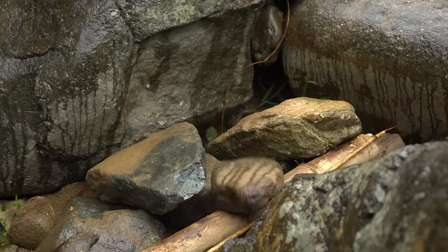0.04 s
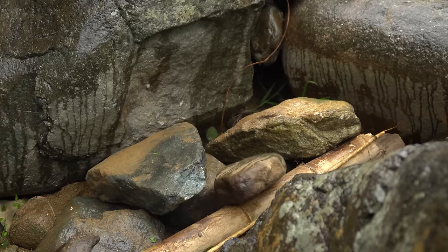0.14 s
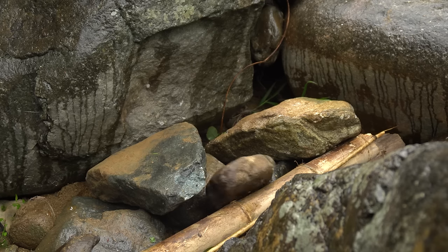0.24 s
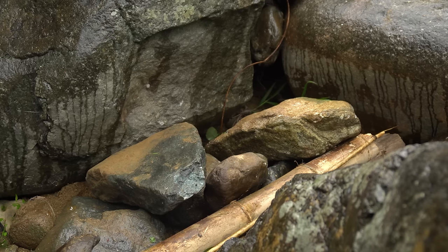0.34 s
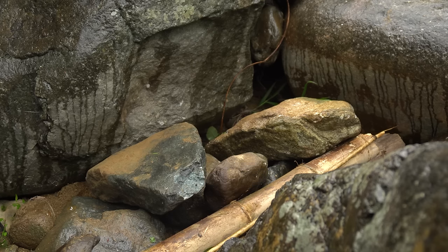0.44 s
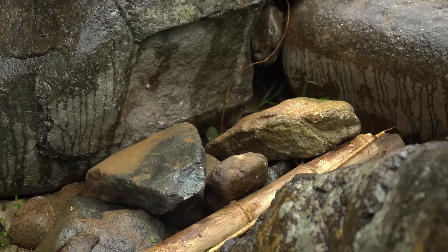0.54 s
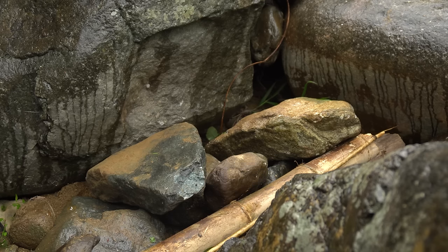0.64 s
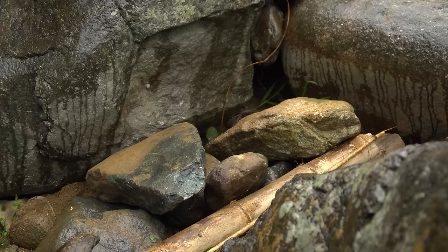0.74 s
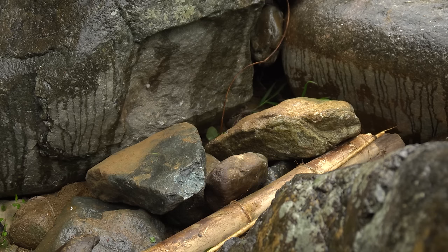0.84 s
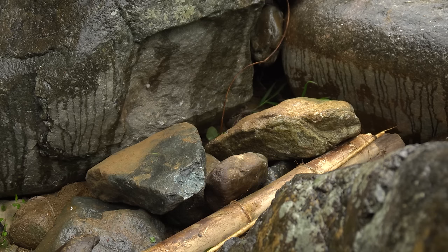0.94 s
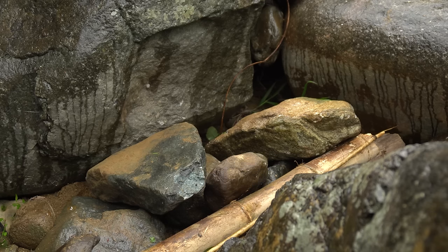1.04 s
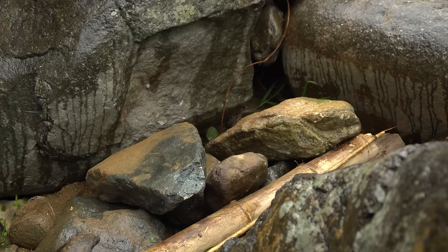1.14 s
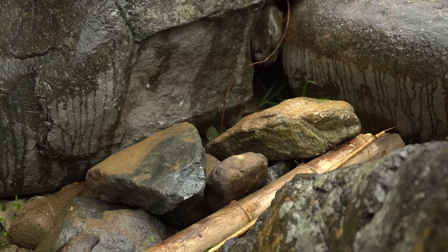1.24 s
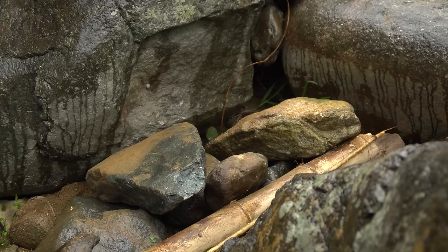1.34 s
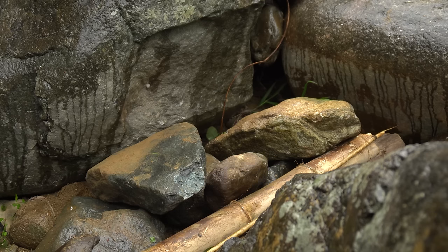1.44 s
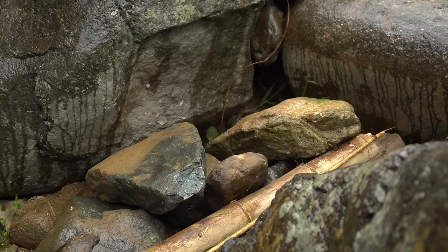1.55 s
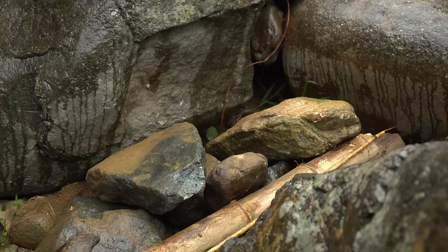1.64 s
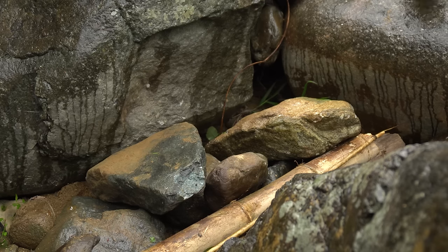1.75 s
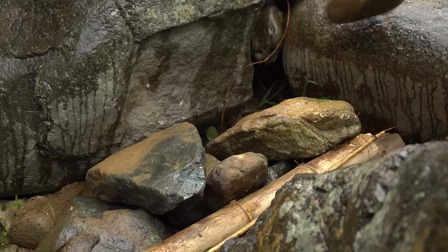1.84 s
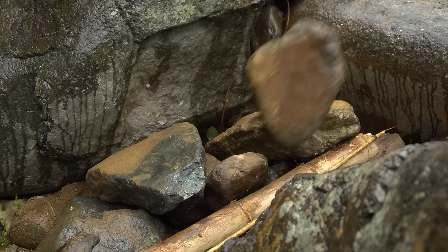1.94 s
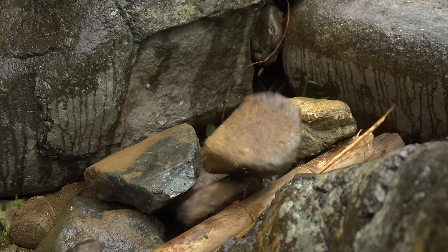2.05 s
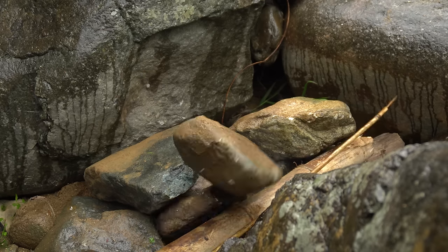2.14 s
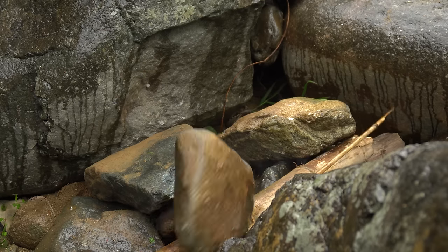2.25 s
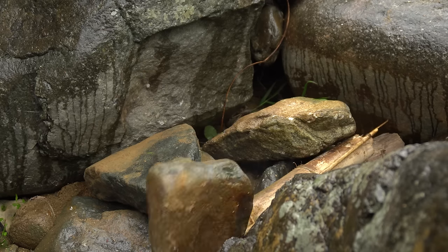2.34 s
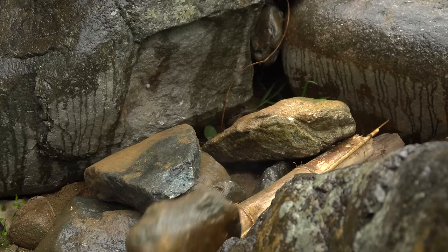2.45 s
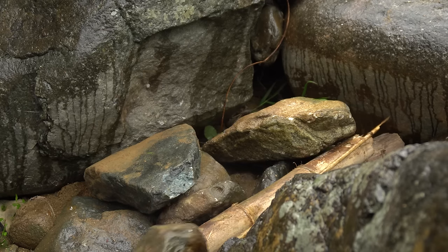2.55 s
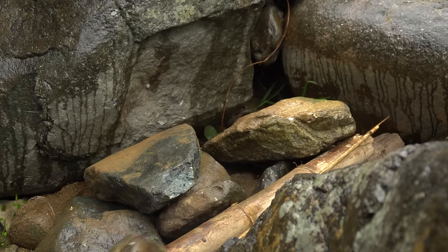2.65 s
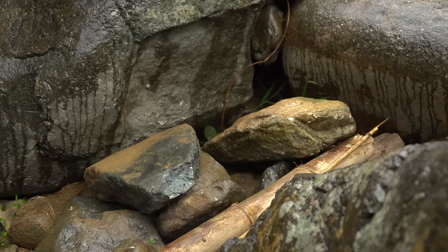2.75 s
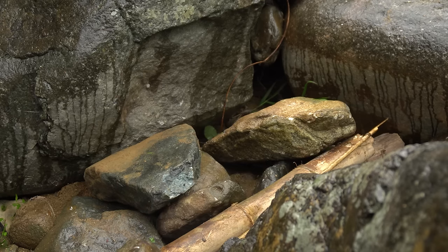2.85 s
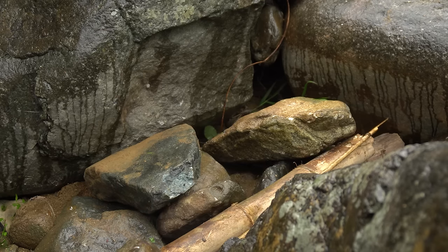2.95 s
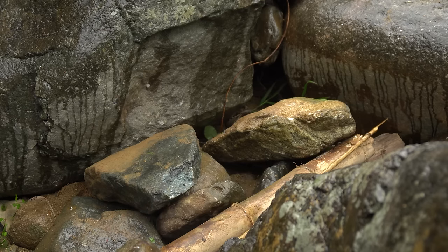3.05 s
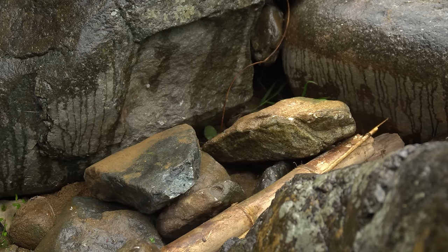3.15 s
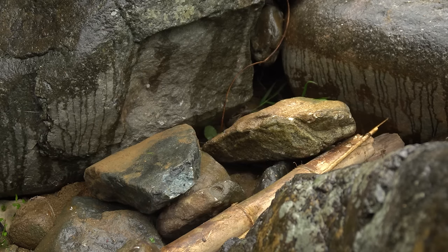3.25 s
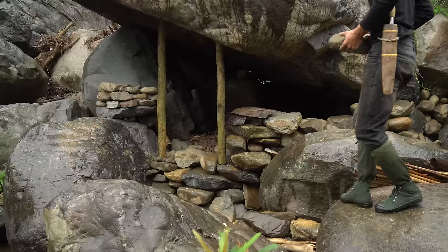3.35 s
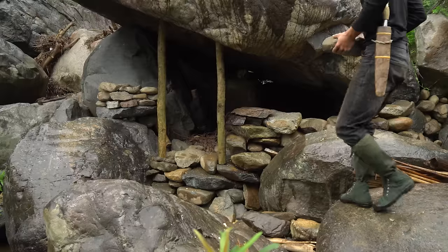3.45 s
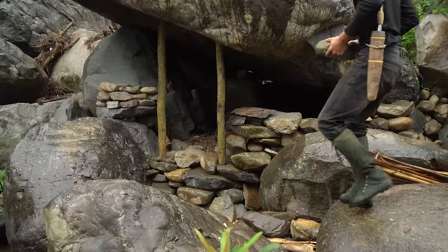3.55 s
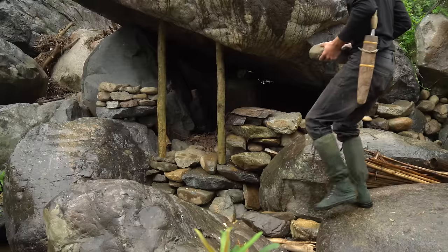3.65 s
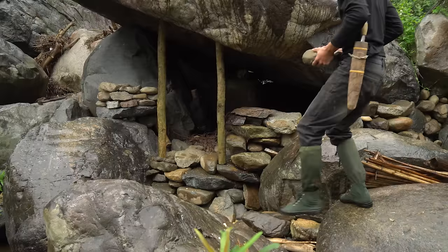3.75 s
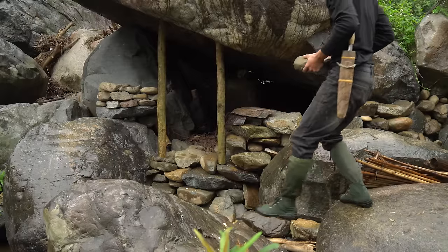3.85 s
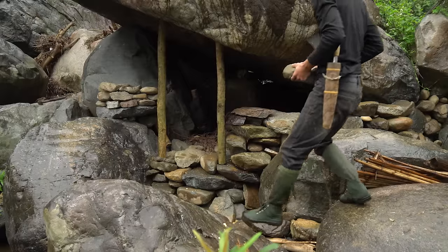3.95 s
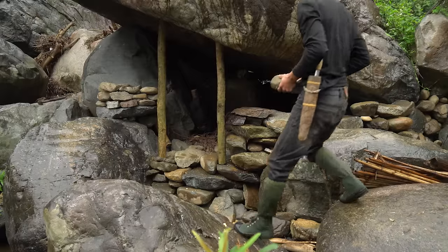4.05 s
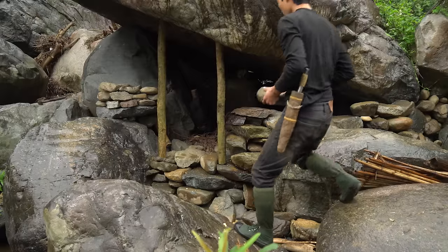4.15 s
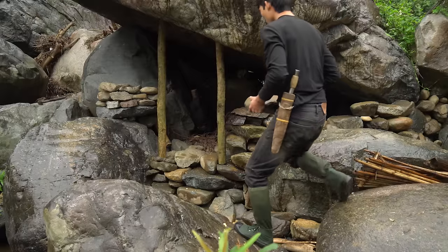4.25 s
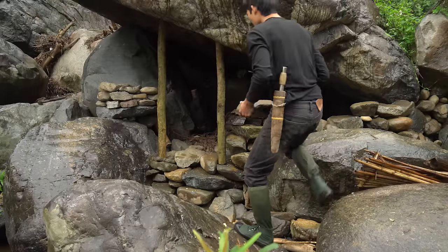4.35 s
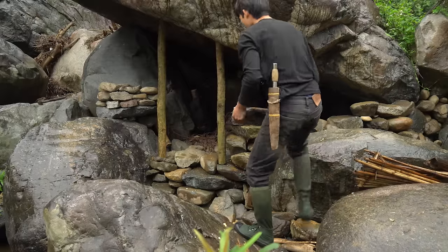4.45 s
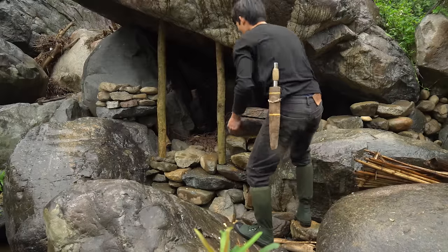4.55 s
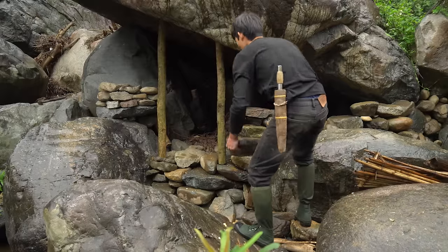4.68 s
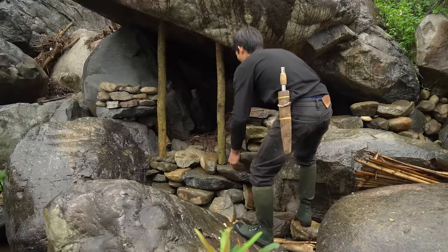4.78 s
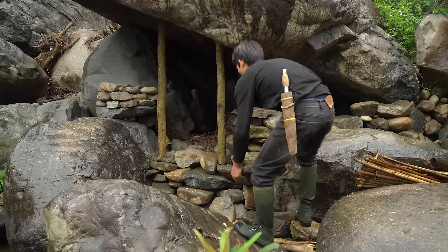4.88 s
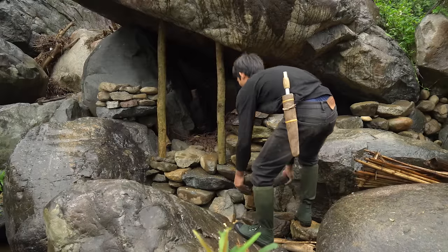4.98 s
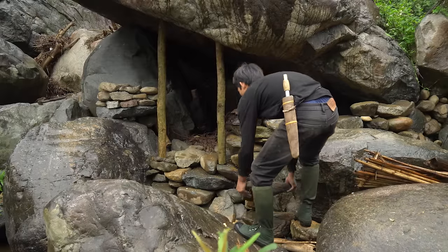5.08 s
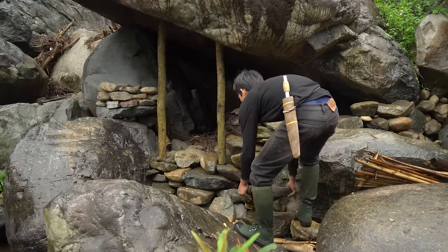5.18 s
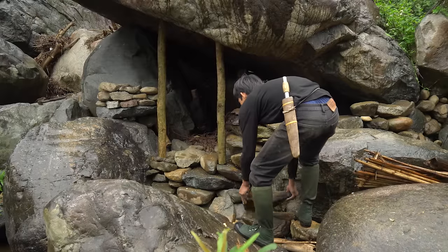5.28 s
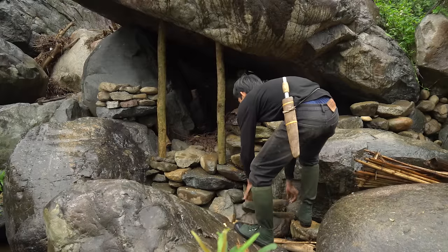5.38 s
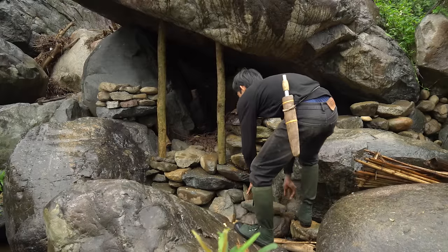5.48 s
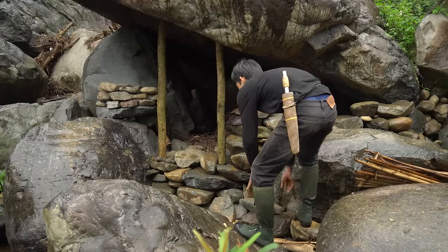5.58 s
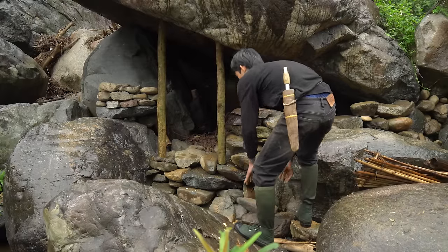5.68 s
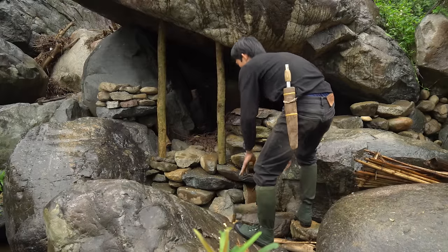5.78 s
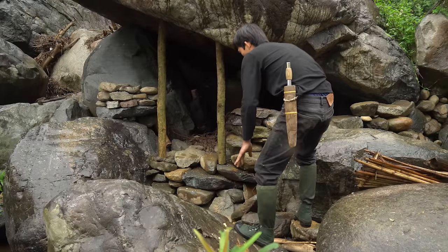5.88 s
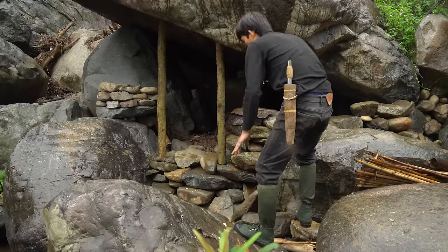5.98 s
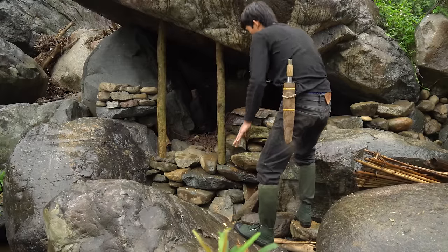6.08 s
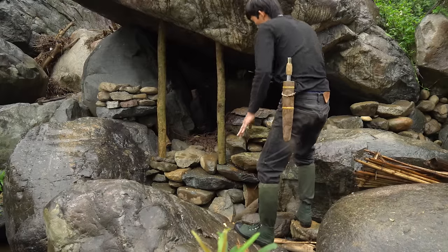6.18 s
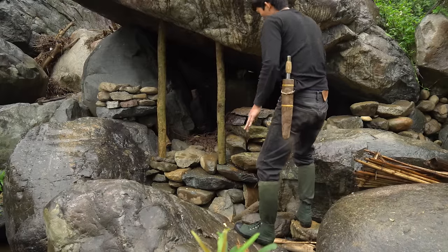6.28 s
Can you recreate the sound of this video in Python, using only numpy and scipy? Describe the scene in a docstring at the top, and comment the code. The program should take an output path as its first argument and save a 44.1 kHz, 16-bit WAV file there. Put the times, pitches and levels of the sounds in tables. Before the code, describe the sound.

Loose stones clatter, tumble and clink into a rocky hollow in separate bursts, with deep thuds, gritty scraping and a faint stream hissing behind.

```python
"""Stones are thrown and set down in a hollow between wet boulders. Each knock is a short contact pulse plus a dense
swarm of filtered-noise echoes; boots and heavy stones boom in the ground; small stones and a flat stone ring as
decaying sines. Tumbling stones are coarse grains in the hollow's modes; scraping grit and rustling cloth are
finer grains. A stream hisses behind as shaped noise, first heard from inside the hollow, then from the open."""
import sys
import numpy as np
from scipy.fft import rfft, irfft, next_fast_len
from scipy.io import wavfile
from scipy.ndimage import uniform_filter1d, map_coordinates

SR = 44100
rng = np.random.default_rng(int(sys.argv[2]) if len(sys.argv) > 2 else 0)


def inscribe(sig):
    """Save sig as 16-bit PCM at rate SR to the path in sys.argv[1].

    A 1-D sig is mono; a 2-D sig holds one channel per row.
    Samples are clipped to [-1, 1] before scaling.
    """
    pcm = np.round(np.clip(np.atleast_2d(sig).T, -1, 1) * 32767)
    wavfile.write(sys.argv[1], SR, pcm.astype(np.int16))


N = 278712

# left-right likeness of the stream and the rustle: f/Hz, likeness (1 = same on both sides)
STREAM_LIKENESS = [(60, 1), (180, 0.97), (550, 0.75), (1650, 0.46), (4970, 0.24), (15000, 0.17)]
# left-right likeness of the stone sounds: f/Hz, likeness (1 = same on both sides)
STONE_LIKENESS = [(60, 1.0), (120, 1.0), (240, 1), (480, 0.98), (950, 0.82), (1890, 0.78), (3770, 0.47),
                  (7520, 0.15), (15000, 0.25)]
# spectrum of grit between stones: f/Hz, density/dB per Hz
GRIT_SPECTRUM = [(880, -26), (1500, -6.5), (1900, -3.5), (2890, 5), (3210, -5.5), (3580, 2.5), (4440, -5.5),
                 (6190, -4), (8880, -11), (10100, -15), (15500, -11)]
# modes of the flat stone: f/Hz, level/dB, t60/s
SLAB_MODES = [(3817, -6.5, 0.25), (4160, -6, 0.12), (4297, 5, 0.14), (5650, -6.5, 0.18), (6420, -9.5, 0.24),
              (7560, -3, 0.078), (9150, -4, 0.074)]
# stones tumbling, one list a throw: t/s, rumble/dB, grit hiss/dB
THROWS = [
    [(.03, -60, -74), (.2, -38, -57), (.42, -35, -48), (.5, -56.5, -86)],
    [(1.56, -60, -70), (1.63, -36, -52), (1.72, -60, -59)],
    [(2.04, -34.5, -52), (2.12, -25, -42), (2.165, -34, -44), (2.2, -23.5, -40), (2.3, -49.5, -46),
     (2.4, -32, -37), (2.45, -38, -44.5), (2.48, -41.5, -36), (2.6, -45, -30.5), (2.66, -41, -46),
     (2.79, -29.5, -33), (2.85, -48, -49), (2.92, -55.5, -49), (3.0, -75, -85)],
    [(5.41, -40.5, -58), (5.46, -23.5, -52), (5.6, -35.5, -69), (5.8, -33.5, -57), (5.9, -44, -73),
     (6.0, -31.5, -49), (6.2, -40, -43), (6.32, -66, -46.5)],
]


def amp(db):
    """Amplitude ratio of a level in dB."""
    return 10 ** (np.asarray(db) / 20)


def unit(x):
    """x scaled to rms 1."""
    return x / np.sqrt(np.mean(np.abs(x) ** 2) + 1e-20)


def along(points, f_hz):
    """Curve through (Hz, value) points on a log frequency axis."""
    f, v = np.transpose(points)
    return np.interp(np.log(f_hz + 1), np.log(f + 1), v)


def level(t_s, db):
    """Gain per sample from times and dB, -120 dB outside them."""
    return amp(np.interp(np.arange(N) / SR, t_s, db, left=-120, right=-120))


def swell(peak_s, db, rise_s, fall_s):
    """Gain that climbs to its peak and falls, straight in dB; rise and fall span 20 dB, at least 1 ms."""
    t = np.arange(N) / SR - peak_s
    rising = -t / max(rise_s, .001)
    falling = t / max(fall_s, .001)
    return amp(db - 20 * np.where(t < 0, rising, falling))


def wobble(rate_hz):
    """Smooth random curve with rate_hz knots a second."""
    knots = rng.standard_normal(int(N * rate_hz / SR) + 4)
    return map_coordinates(knots, [np.arange(N) * rate_hz / SR])


def add_at(out, t_s, sound):
    """Mix a sound into out, in place, from t_s on."""
    start = round(t_s * SR)
    out[..., start:start + sound.shape[-1]] += sound


def filtered(x, response):
    """x times a complex response of frequency."""
    n = x.shape[-1]
    m = next_fast_len(n + 4096)
    return irfft(rfft(x, m) * response(np.fft.rfftfreq(m, 1 / SR)), m)[..., :n]


def resonance(f, f0_hz, width_hz):
    """Causal band-pass of one damped mode."""
    return 1j * f * width_hz / (f0_hz * f0_hz - f * f + 1j * f * width_hz)


def hollow(f):
    """Broad modes of the air between the boulders, alternating in sign, over an even share."""
    # air modes: f/Hz, width/Hz, level/dB
    air_modes = [(303, 310, -6), (407.2, 58, 8), (498, 43, 0), (630, 49, 5.5), (700, 49, 4),
                 (798, 118, 7.5), (1064, 73, -7.5), (1290, 51, -47)]
    modes = sum((-1) ** k * amp(db) * resonance(f, f0, width) for k, (f0, width, db) in enumerate(air_modes))
    little_bass = (1j * f / (170 + 1j * f)) ** 2  # small stones radiate little of it
    return (0.91 + modes) * little_bass


def body(f, f0_hz, relative_width):
    """Broad band around a stone's pitch; its own note and two chance neighbours stand out."""
    notes_hz = f0_hz * np.array([1, *np.exp(rng.normal(0, 0.368, 2))])
    notes = sum(resonance(f, note_hz, 0.066 * note_hz) for note_hz in notes_hz)
    return resonance(f, f0_hz, relative_width * f0_hz) ** 3 * (1 + 1.27 * notes)


def spread(pair, likeness, colour):
    """Two unrelated signals become left and right, as alike as the table says; rms 1."""
    def mid_side_response(f):
        turn = np.arccos(np.clip(along(likeness, f), -1, 1)) / 2
        return colour(f) * np.array([np.cos(turn), np.sin(turn)])

    mid, side = filtered(pair, mid_side_response)
    return unit(np.array([mid + side, mid - side]))


def grains(shape, lumpy_db):
    """Noise whose samples differ widely in size: many tiny contacts."""
    return rng.standard_normal(shape) * amp(lumpy_db * rng.standard_normal(shape))


def brushing(spectrum, likeness, clump_db, lumpy_db):
    """Fine grains, clumped in time; rms 1."""
    fine = spread(grains((2, N), lumpy_db), likeness, lambda f: amp(along(spectrum, f)))
    return unit(amp(clump_db * wobble(60)) * fine)


def swarm(t, colour, rise_s, t60_s, direct, echoes_per_s):
    """Contact pulse, then a swarm of echoes under one dying envelope; rms 1 over the first 20 ms."""
    hits = rng.random((2, len(t))) < echoes_per_s / SR
    sparse = hits * np.sqrt(SR / echoes_per_s) + 0.54
    tail = filtered(spread(sparse * rng.standard_normal((2, len(t))), STONE_LIKENESS, lambda f: 1), colour)
    tail = np.roll(tail, -SR // 50, axis=1)  # the filter's own build-up goes to the end
    energy = np.abs(uniform_filter1d(np.mean(tail ** 2, axis=0), size=SR // 150))
    tail = tail / (energy + 0.15 * energy.mean()) ** 0.48  # the tail's uneven loudness is partly smoothed out
    early_boost = 1 + 0.85 * np.exp(-t / 0.019)
    envelope = amp(-60 * t / t60_s) * early_boost * (1 - np.exp(-t / rise_s))
    pulse = filtered(1. * (t == 0), colour)
    pulse = direct * np.sqrt(SR) * pulse / np.linalg.norm(pulse)
    sound = unit(tail) * envelope + pulse
    return sound / np.sqrt(np.mean(sound[:, :SR // 50] ** 2))


def ring(f_hz, db, t60_s, drift_rad, touch_db):
    """One mode, broken up as the stone keeps touching its neighbours; its phase differs at each side."""
    t = np.arange(SR // 3) / SR
    wander = np.cumsum(rng.standard_normal(len(t))) * drift_rad  # random step a sample
    touch = map_coordinates(rng.standard_normal(40), [t * 90])
    phase = 2 * np.pi * f_hz * t + wander + rng.normal(0, 0.4, (2, 1))
    decay = amp(db + touch_db * touch - 60 * t / max(t60_s, .02))
    return decay * (1 - np.exp(-t / 0.00052)) * np.sin(phase)


def tumbling(column):
    """Gain per sample of one column of the throws: 1 rumble, 2 grit hiss."""
    return sum(level(np.transpose(rows)[0], np.transpose(rows)[column]) for rows in THROWS)


def stream():
    """Far water: lumpy noise, gently flickering, in two perspectives."""
    # level in the hollow, then in the open: t/s, level/dB
    near_level = [(0, -43.5), (.5, -51.5), (.75, -48), (1.1, -46), (1.9, -48.5), (2.9, -48), (3.1, -56.5),
                  (3.335, -54.5)]
    open_level = [(3.336, -46), (6.32, -46.5)]
    # spectrum in the hollow, then in the open: f/Hz, density/dB per Hz
    near_spectrum = [(15, -37), (25, -2), (178, -2.5), (305, -6.5), (509, -4), (631, -9.5), (1080, -10),
                     (1620, -11.5), (1850, -10), (2120, -10.5), (3260, -9), (5580, -24.5), (7910, -29),
                     (15500, -27.5)]
    open_spectrum = [(15, -50), (25, -16), (91, 1), (156, -5), (204, -0.5), (240, -6), (368, -4.5),
                     (509, -6.5), (703, -6), (1240, -11.5), (2920, -8.5), (6920, -23), (8130, -28.5),
                     (15500, -41)]

    def water(spectrum):
        return spread(grains((2, N), lumpy_db=2.5), STREAM_LIKENESS, lambda f: amp(along(spectrum, f)))

    near = level(*np.transpose(near_level)) * water(near_spectrum)
    far = level(*np.transpose(open_level)) * water(open_spectrum)
    flicker_db = 0.84 * wobble(6.7) + 0.23 * wobble(22.97)
    return amp(flicker_db) * (near + far)


def rustle():
    """Cloth and leaves brushing as someone moves: soft fine grains that swell and fall."""
    # brushes: peak t/s, level/dB, 20 dB rise/s, 20 dB fall/s (swell takes at least 1 ms)
    brushes = [(.476, -54, 6, -0.66), (.632, -50, 0.4, .15), (.96, -43.5, 0.23, .08),
               (1.212, -34, -0.04, 0.02), (1.426, -46, .5, .13), (3.05, -56, 3.5, 1.8),
               (4.165, -42, .03, .05), (4.238, -46, .012, .08), (4.398, -44, .005, .04),
               (4.46, -44, .025, .11), (4.62, -47, .03, .05), (4.772, -50, .005, .04),
               (5.41, -44.5, 0.47, 0.55)]
    # f/Hz, density/dB per Hz
    airy_spectrum = [(880, -27), (1500, -12), (1590, -24), (2440, 1), (3690, -4), (4990, -8), (8210, -5),
                     (9600, -19), (11900, -5), (15500, -16)]
    gain = sum(swell(*row) for row in brushes)
    return gain * brushing(airy_spectrum, STREAM_LIKENESS, clump_db=1.5, lumpy_db=0.0)


def grit_scrape():
    """Grit between tumbling stones and skidding under single ones: fine lumpy grains."""
    # skids: peak t/s, hiss/dB
    skid_rows = [(0.04, -28), (.156, -34), (.298, -42.5), (1.778, -60), (2.208, -37), (2.362, -24.5),
                 (2.606, -23.5), (5.932, -31), (6.03, -21), (6.289, -35.5)]
    skids = sum(swell(s, db, rise_s=0.0067, fall_s=0.023) for s, db in skid_rows)
    gain = tumbling(column=2) + skids
    return gain * brushing(GRIT_SPECTRUM, STONE_LIKENESS, clump_db=1.9, lumpy_db=2.5)


def roll():
    """Coarse grains excite the hollow while stones tumble."""
    def colour(f):
        return hollow(f) * resonance(f, 340, 1630) ** 2 / (1 + (f / 1400) ** 4)

    clumps = amp(3 * wobble(70))
    return tumbling(column=1) * spread(clumps * grains((2, N), lumpy_db=3), STONE_LIKENESS, colour)


def rattles():
    """Small contacts at chance moments, more often and louder where the stones tumble hard."""
    count = 16
    rumble = tumbling(column=1)
    often = np.cumsum(np.sqrt(rumble) * (rumble > amp(-60)))
    when, size, pitch = rng.random((count, 3)).T
    at = np.searchsorted(often, (np.arange(count) + when) / count * often[-1]).clip(0, N - 1)
    thud_hz = 600 * 2 ** (pitch - .5)
    thud_db = 20 * np.log10(rumble[at]) + 2 - 8 * size
    hiss_db = 20 * np.log10(tumbling(column=2)[at] / rumble[at]).clip(max=-12)  # over the rumble
    # same columns as the knocks
    return [(a / SR, db, hz, 3.3 * hz, 7.5 + hiss, 1 + hiss, 0.062)
            for a, db, hz, hiss in zip(at, thud_db, thud_hz, hiss_db)]


def knocks():
    """Stone or boot on stone, in three bands: the hollow thuds, the stone clacks, grit hisses."""
    # contacts: t/s, thud/dB, thud centre f/Hz, clack centre f/Hz, clack over thud/dB, grit over thud/dB, t60/s
    contacts = [(.034, -25, 369, 2440, -10, -14, 0.22), (0.081, -42, 227, 3000, -2, -3.5, 0.066),
                (.139, -24.5, 543, 1566, 2.5, -45, 0.2), (.156, -20, 415, 2670, -7.5, -19.5, 0.2),
                (.228, -23.5, 344, 3000, -7.5, -21, 0.15), (.266, -17.5, 426, 2670, -8, -21, 0.14),
                (.336, -15.5, 670, 1584, -15, -23.5, 0.082), (.373, -16, 419, 1790, -10.5, -15.5, 0.18),
                (.399, -21.5, 555, 1810, -12.5, -44, 0.063), (.776, -49, 646, 3160, 3.5, -25, 0.078),
                (1.213, -54.5, 437, 3300, 18.5, 17, 0.4), (1.563, -31.5, 950, 1490, 8, -15, 0.061),
                (1.573, -22.5, 1290, 1420, -7, -23, 0.37), (1.613, -27, 580, 1360, 0.5, -13.5, 0.19),
                (1.779, -19, 582, 2880, -38, -17, 0.099), (1.799, -28, 640, 1430, -41, -25, 0.23),
                (1.98, -57, 447, 3170, 13.5, -15, .12), (2.035, -19, 378, 1530, -9.5, -17.5, 0.23),
                (2.073, -16, 655, 1620, -3.5, -15, 0.59), (2.1, -22, 700, 1590, -17, -35, 0.12),
                (2.113, -21.5, 416, 2420, -1, -34, 0.21), (2.139, -18.5, 720, 2150, -1.5, -14.5, 0.11),
                (2.173, -19, 630, 1437, -1, -35, 0.23), (2.186, -24.5, 906, 2100, 2, -41, 0.1),
                (2.196, -20, 724, 2200, -7, -37, 0.083), (2.209, -25.5, 740, 2470, 1.5, -12, 0.18),
                (2.245, -25, 295, 2460, -6, -36, 0.17), (2.321, -33, 706, 1860, -15, -9, 0.24),
                (2.335, -25.5, 585, 2570, -13, -39, 0.095), (2.35, -18.5, 498, 2250, -5, -14.5, 0.17),
                (2.373, -22, 690, 1490, -14, -31, 0.041), (2.392, -15.5, 401, 2050, -11, -31, 0.15),
                (2.407, -28.5, 393, 2780, -3.5, -6.5, 0.12), (2.464, -39, 600, 2840, 5.5, -19, 0.087),
                (2.485, -26, 610, 2880, -10, -19, 0.13), (2.534, -26, 527, 2570, -18, -34.5, .11),
                (2.575, -41.5, 436, 3020, 7, 2, 0.21), (2.594, -31, 840, 1600, 1, 5.5, 0.26),
                (2.607, -34.5, 624, 2350, -4, 15, 0.055), (2.666, -22.5, 800, 1980, -0.5, -27, 0.33),
                (2.673, -26, 1290, 1980, 5, -15, 0.077), (2.714, -31, 372, 1720, -13, -5.5, 0.29),
                (2.748, -25, 840, 1600, -1.5, -38, 0.29), (2.767, -17.5, 688, 1730, -1.5, -50, 0.1),
                (2.784, -22, 710, 3050, -1.5, -42, 0.11), (2.833, -46.5, 560, 2680, 8, 10, 0.043),
                (2.881, -38, 800, 2880, -19, 14, 0.095), (2.906, -40.5, 497, 2396, -16, 14, .15),
                (3.588, -59.5, 627, 2030, 8.5, -24, 0.13), (4.037, -48, 836, 2550, -9, -20, .08),
                (4.092, -48, 630, 1900, 3.5, -27, .12), (4.142, -40, 382, 2330, 3, -16, 0.26),
                (4.231, -54, 751, 2500, 4, -16, .14), (4.25, -41, 634, 1880, 7, -26, 0.27),
                (4.277, -44.5, 580, 1410, 2.5, -31, .16), (4.587, -49, 1160, 1430, -28, -24, 0.087),
                (4.609, -47.5, 366, 2780, 10, -1, 0.15), (4.658, -48, 791, 1950, 3, -19.5, 0.55),
                (4.692, -37.5, 206, 2720, -9.5, -18, 0.25), (4.77, -34, 1145, 2320, 1, -31, 0.21),
                (5.239, -48.5, 665, 1810, 0, -29, .12), (5.413, -16.5, 816, 2240, -6, -52, 0.19),
                (5.421, -24, 600, 1900, -5, -42, 0.37), (5.445, -18.5, 850, 1450, -24, -40, .1),
                (5.488, -16, 817, 1330, -17, -52, 0.12), (5.511, -23, 810, 1420, -41, -44, 0.36),
                (5.578, -18, 545, 1590, -45, -25, 0.26), (5.599, -18.5, 607, 1550, -50.5, -38, 0.11),
                (5.633, -17, 540, 1400, -46, -51, 0.3), (5.664, -23, 535, 1460, -40, -45, 0.12),
                (5.709, -25, 516, 1400, -37, -49, 0.43), (5.745, -24, 376, 1390, -38, -51, 0.23),
                (5.759, -24.5, 563, 1570, -39, -26.5, 0.1), (5.841, -25.5, 377, 1380, -15.5, -51, 0.19),
                (5.865, -27, 400, 1380, -35, -41, 0.061), (5.917, -21, 368, 1770, -17, -41, .19),
                (5.929, -14, 600, 1400, -21, -58, 0.23), (5.958, -18.5, 770, 1910, -48, -30.5, .12),
                (6.019, -44, 435, 2940, 5, 11.5, 0.088), (6.034, -36, 710, 2320, 5, 10, 0.22),
                (6.099, -26, 415, 1895, -10, -19, 0.19), (6.171, -29, 298, 1420, -10, -10.5, 0.17),
                (6.295, -25, 910, 1940, -9, -46, 0.17)]
    # where the stones and boots are: t/s, left over right in the treble/dB
    place = [(0, 1.5), (1.3, 5), (1.5, -1.5), (2.4, 2), (2.9, 0), (4.0, -1), (5.5, -1.5), (6.32, .5)]
    out, t = np.zeros((2, N + SR)), np.arange(SR // 3) / SR
    for s, db, thud_hz, clack_hz, clack_db, grit_db, t60_s in contacts + rattles():
        t60_s = max(t60_s, .02)
        pan_db = np.interp(s, *np.transpose(place)) + rng.normal(0, 1.5)

        def thud_colour(f):
            soft = 1 / (1 + 1j * f / (2.43 * thud_hz)) ** 4  # contact too long to drive high frequencies
            return body(f, thud_hz, 2.82) * soft * hollow(f)

        def clack_colour(f):
            return body(f, clack_hz, 1.67) / (1 + 1j * f / (1.96 * clack_hz)) ** 2

        def grit_colour(f):
            return amp(along(GRIT_SPECTRUM, f)) * resonance(f, 10400, 10000)

        thud = swarm(t, thud_colour, 0.4 / thud_hz, t60_s, direct=0.095, echoes_per_s=400)
        clack = swarm(t, clack_colour, 0.00024, 0.83 * t60_s, direct=0.039, echoes_per_s=1400)
        grit = swarm(t, grit_colour, 0.00084, 0.84 * t60_s, direct=0.016, echoes_per_s=5800)
        bright = amp(clack_db) * clack + amp(grit_db) * grit
        panned = bright * amp([[pan_db / 2], [-pan_db / 2]])  # the thud has no pan
        add_at(out, s, amp(db) * (thud + panned))
    return out[:, :N]


def thumps():
    """Heavy landings shake the ground, which booms in one low band, without pan."""
    # landings: t/s, boom/dB
    landings = [(0.035, -41), (0.157, -37.5), (.228, -42), (0.268, -37), (.373, -43), (1.564, -40.5),
                (1.611, -40), (1.779, -31), (2.035, -33.5), (2.073, -32), (2.113, -36), (2.201, -41.5),
                (2.351, -31.5), (2.486, -41.5), (2.725, -38), (4.14, -51), (4.608, -52), (4.693, -40),
                (4.721, -45), (5.416, -33), (5.443, -40), (5.488, -31.5), (5.576, -29), (5.635, -32),
                (5.759, -40.5), (5.925, -31.5), (6.034, -38), (6.17, -40), (6.295, -39)]
    out, t = np.zeros((2, N + SR)), np.arange(SR // 3) / SR
    for s, db in landings:
        boom = swarm(t, lambda f: resonance(f, 123.5, 110) ** 3, rise_s=0.005, t60_s=0.48,
                     direct=0.14, echoes_per_s=530)
        add_at(out, s, amp(db) * boom)
    return out[:, :N]


def clinks():
    """Small hard stones that sing one decaying note each."""
    # notes: t/s, f/Hz, level/dB, t60/s
    notes = [(.138, 6420, -37, 0.11), (.138, 7740, -42, .1), (0.157, 2620, -25, 0.063),
             (.232, 2600, -31, 0.12), (.373, 6520, -33.5, 0.13), (0.374, 8900, -42, 0.087),
             (.39, 7850, -43, 0.16), (1.212, 3500, -24, 0.077), (1.225, 2050, -39, 0.44),
             (1.61, 8120, -29, 0.049), (1.779, 7000, -50, 0.32), (2.035, 6960, -29, 0.095),
             (2.076, 6960, -41, .08), (2.113, 2520, -21, 0.22), (2.208, 6500, -30.5, 0.099),
             (2.411, 2970, -25, 0.13), (2.465, 3610, -40, 0.51), (2.55, 3580, -35, 0.17),
             (2.58, 3620, -33, 0.08), (6.026, 2840, -23, 0.05), (6.07, 3540, -38, 0.16)]
    out = np.zeros((2, N + SR))
    for s, f_hz, db, t60_s in notes:
        add_at(out, s, ring(f_hz, db, t60_s, drift_rad=0.056, touch_db=3.5))
    return out[:, :N]


def cracks():
    """Sharp cracks at the start of some knocks: one short band-passed pulse each."""
    # pulses: t/s, peak/dB, centre f/Hz
    crack_rows = [(.139, -11, 1600), (0.339, -16.5, 900), (1.563, -21, 1740), (1.613, -14, 1470),
                  (1.779, -14, 760), (2.037, -9, 930), (2.076, -11, 900), (4.143, -21, 1800),
                  (4.251, -25, 1890), (4.771, -20, 1880)]
    out = np.zeros(N + SR)
    kick = 1. * (np.arange(SR // 50) == 0)
    for s, db, f_hz in crack_rows:
        pulse = filtered(kick, lambda f: resonance(f, f_hz, 1.36 * f_hz) ** 2 / (1 + 1j * f / (3 * f_hz)) ** 2)
        add_at(out, s, amp(db) * pulse / np.abs(pulse).max())
    return out[:N]


def slab_dragging():
    """The flat stone keeps singing while it grinds on its neighbours: grains excite its modes."""
    def modes(f):
        width_per_t60 = np.log(1000) / np.pi  # a mode's width in Hz times its t60 in s
        return sum(amp(db) * resonance(f, f0, width_per_t60 / t60) ** 2 for f0, db, t60 in SLAB_MODES)

    s, rumble_db, _ = np.transpose(THROWS[-1])
    touches = spread(amp(4.3 * wobble(40)) * grains((2, N), lumpy_db=7), STONE_LIKENESS, modes)
    return level(s, rumble_db - 28) * touches


def slab_blows():
    """Blows ring all modes of the flat stone; those far from the favoured one answer weakly."""
    # blows: t/s, level/dB, f/Hz that the struck spot favours
    blows = [(5.414, -31.5, 4170), (5.413, -32, 5650), (5.431, -35, 3817), (5.49, -37, 3817),
             (5.487, -44, 7560), (5.511, -38, 6320), (5.512, -38, 5650), (5.55, -53, 7560),
             (5.56, -58, 6420), (5.575, -36, 3817), (5.585, -39, 5650), (5.592, -42.5, 4297),
             (5.635, -40, 3817), (5.65, -45, 7560), (5.735, -43, 3817), (5.795, -43, 6420),
             (5.822, -37.5, 3817), (5.918, -37, 5650), (5.949, -44, 4297), (6.109, -34.5, 3817),
             (6.173, -31, 4297), (6.172, -32, 6420)]
    out = np.zeros((2, N + SR))
    for s, db, spot_hz in blows:
        for f_hz, mode_db, t60_s in SLAB_MODES:
            weaker_db = min(110 * abs(np.log2(f_hz / spot_hz)), 19)
            add_at(out, s, ring(f_hz, db + mode_db - weaker_db, t60_s, drift_rad=.015, touch_db=1.5))
    return out[:, :N]


def scene():
    """Sum of all sources, left and right."""
    background = stream() + rustle()
    loose = grit_scrape() + roll()
    contacts = knocks() + thumps() + clinks() + cracks()
    flat_stone = slab_dragging() + slab_blows()
    return background + loose + contacts + flat_stone


def record(dry):
    """Loud peaks are softly rounded; the microphone drops the deepest bass; nothing stays above the band limit."""
    top_hz, bass_hz = 15750, 45
    soft = dry / (1 + np.abs(dry / .8) ** 4) ** (1 / 4)
    return filtered(soft, lambda f: (f < top_hz) * (1j * f / (bass_hz + 1j * f)) ** 2)


dry = scene()
out = record(dry)
inscribe(out)
```